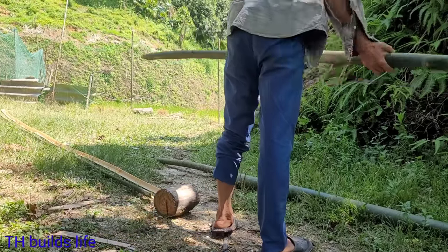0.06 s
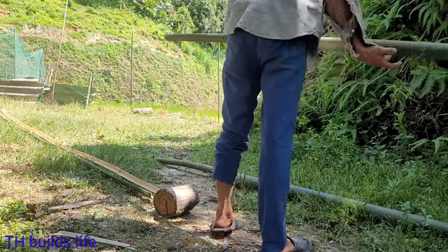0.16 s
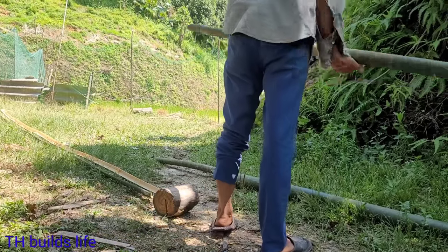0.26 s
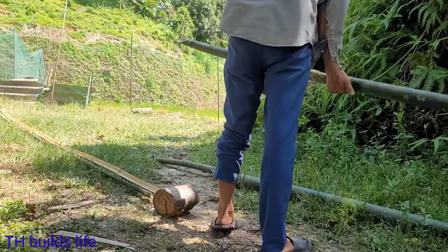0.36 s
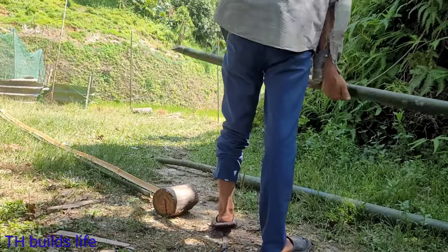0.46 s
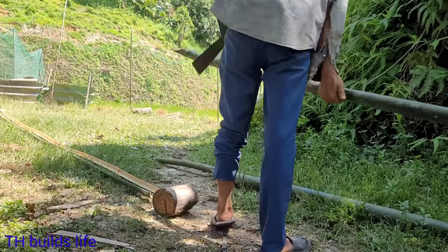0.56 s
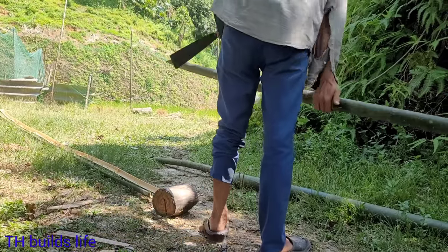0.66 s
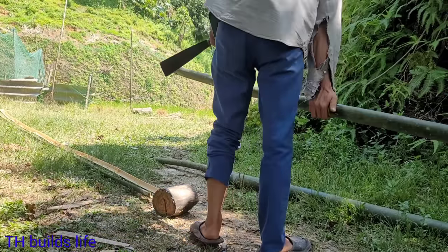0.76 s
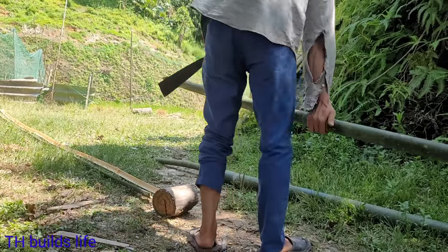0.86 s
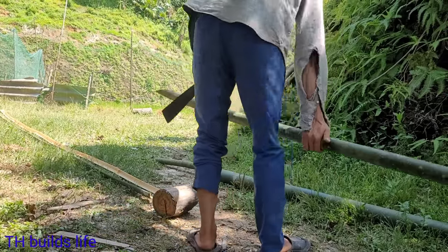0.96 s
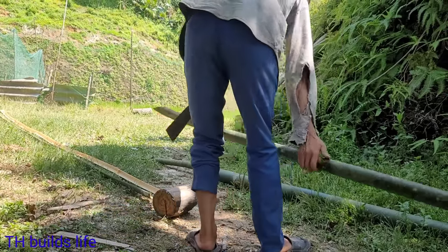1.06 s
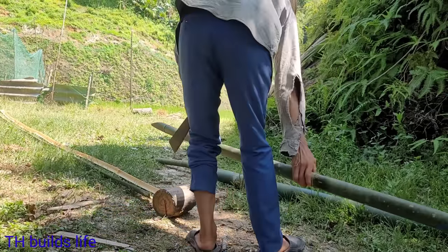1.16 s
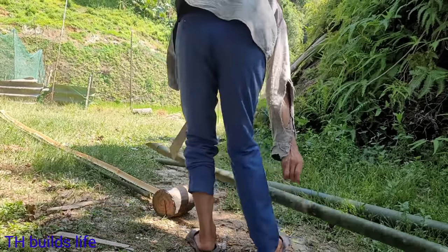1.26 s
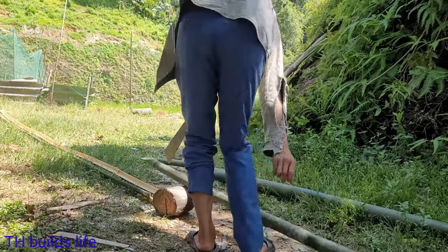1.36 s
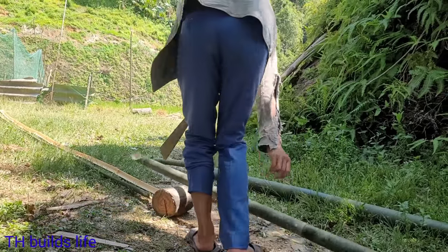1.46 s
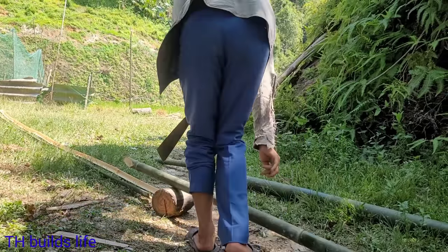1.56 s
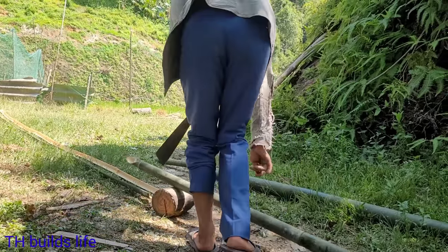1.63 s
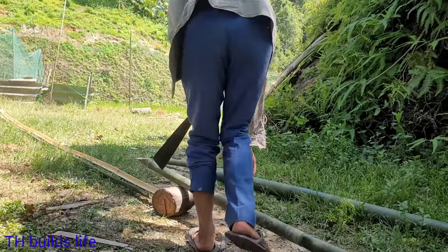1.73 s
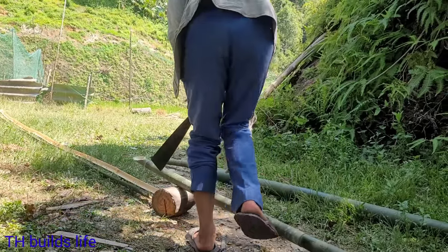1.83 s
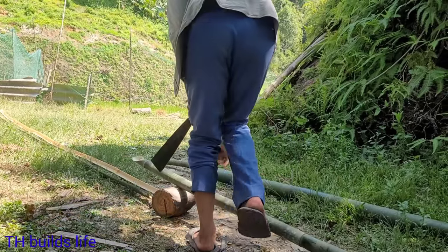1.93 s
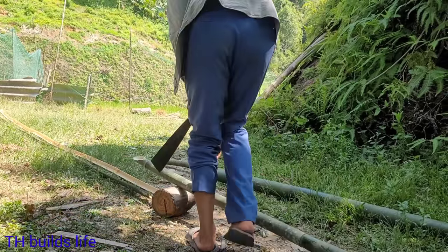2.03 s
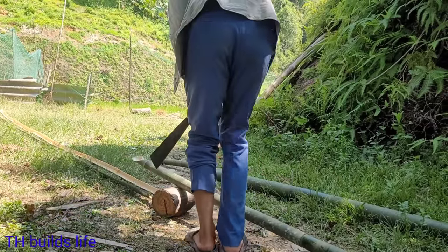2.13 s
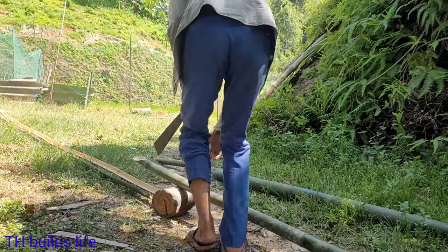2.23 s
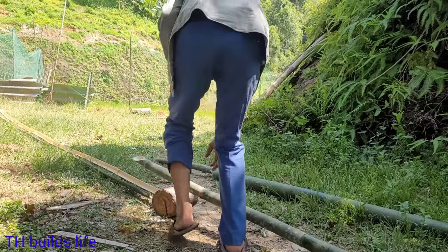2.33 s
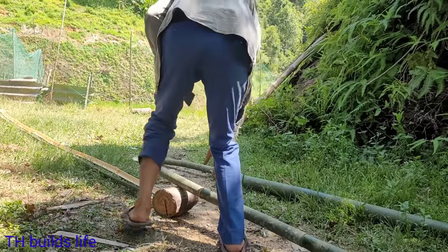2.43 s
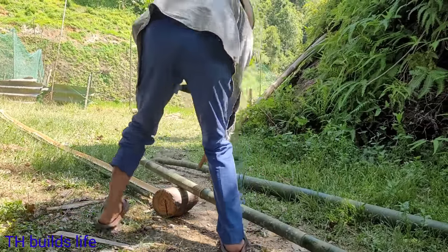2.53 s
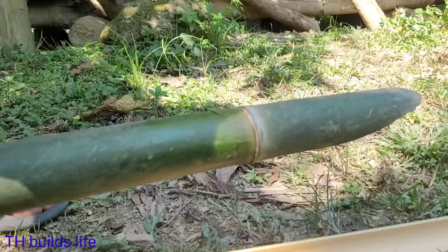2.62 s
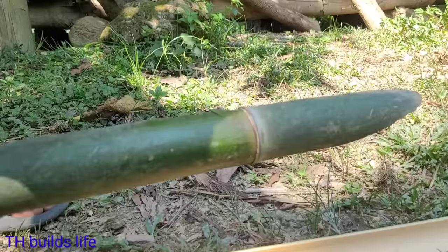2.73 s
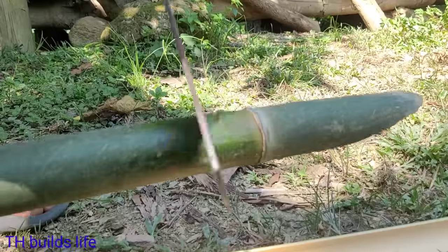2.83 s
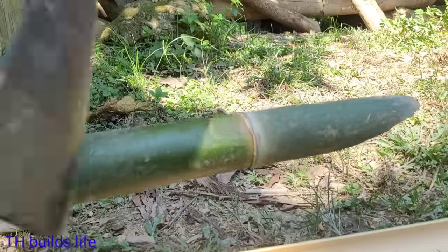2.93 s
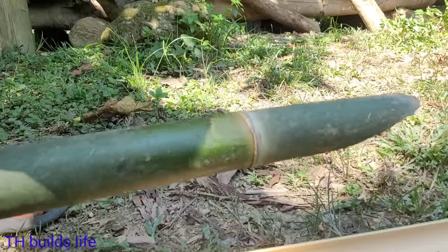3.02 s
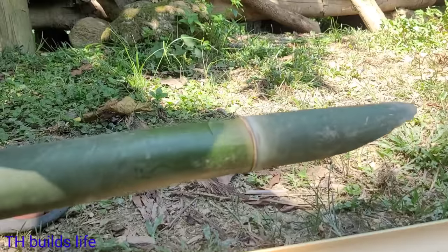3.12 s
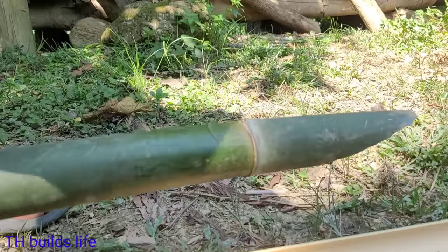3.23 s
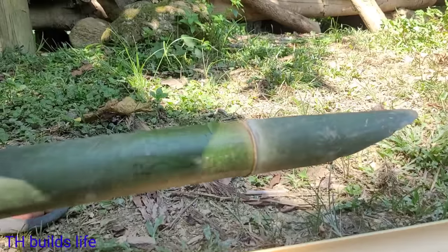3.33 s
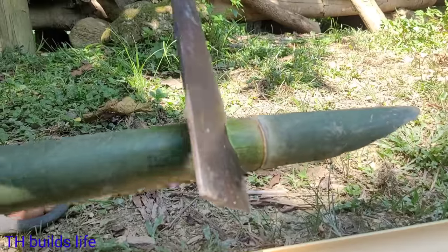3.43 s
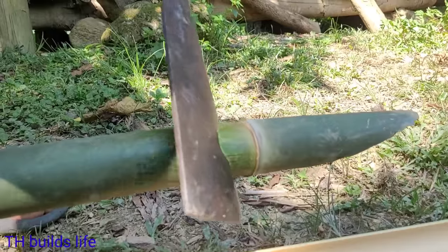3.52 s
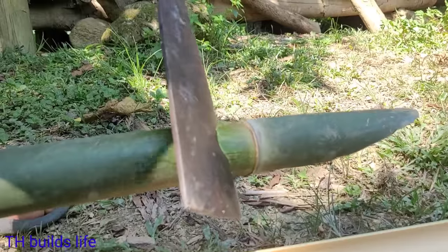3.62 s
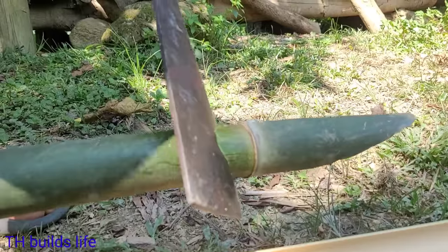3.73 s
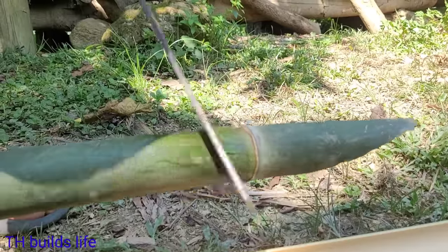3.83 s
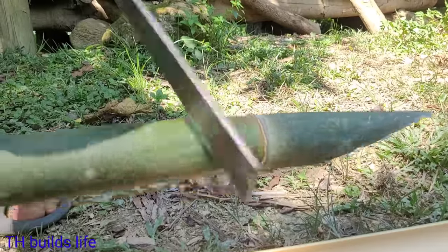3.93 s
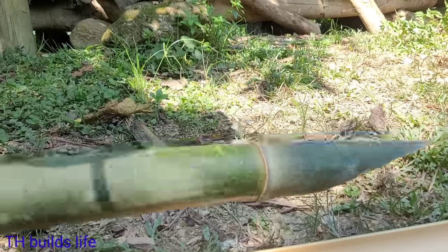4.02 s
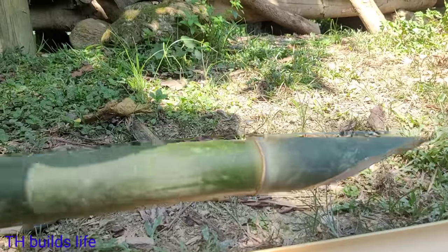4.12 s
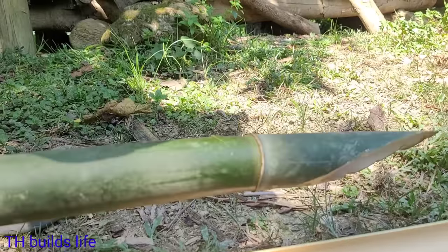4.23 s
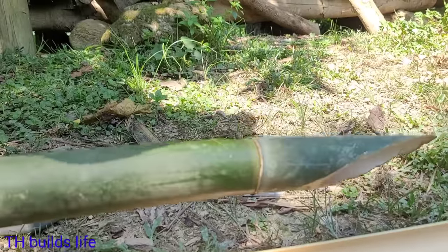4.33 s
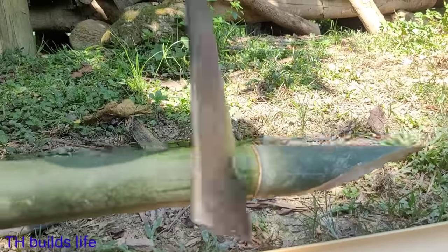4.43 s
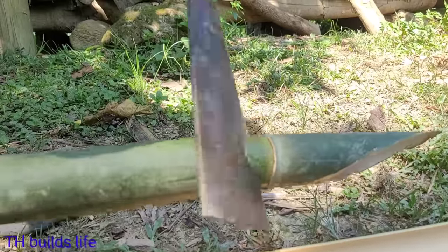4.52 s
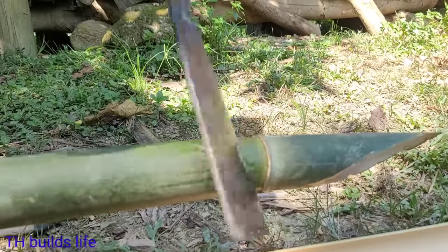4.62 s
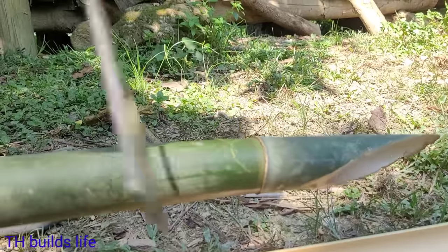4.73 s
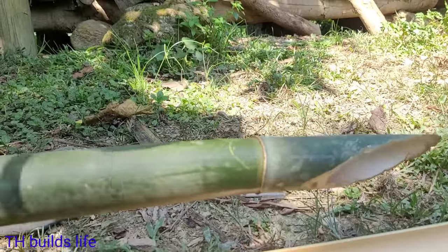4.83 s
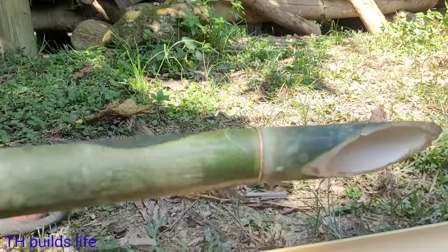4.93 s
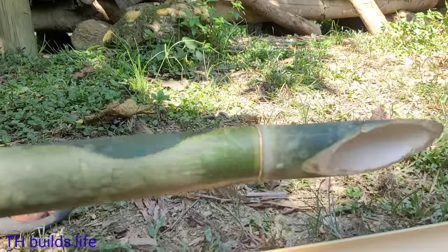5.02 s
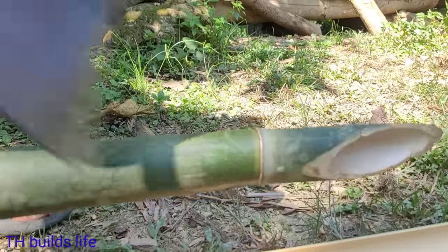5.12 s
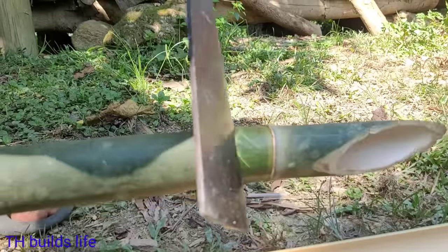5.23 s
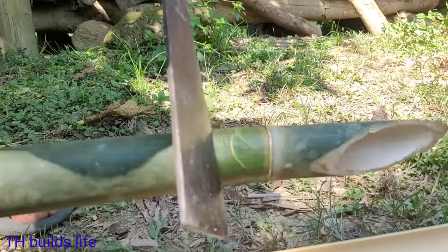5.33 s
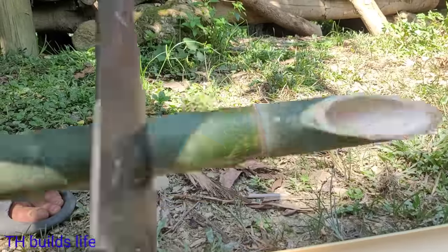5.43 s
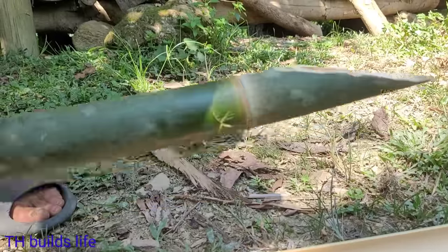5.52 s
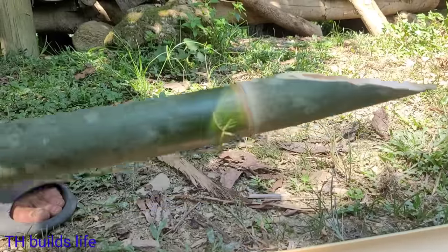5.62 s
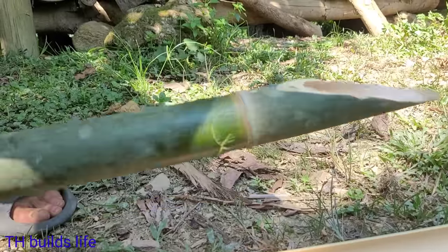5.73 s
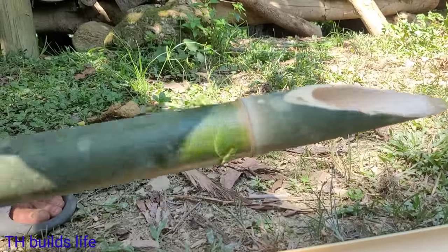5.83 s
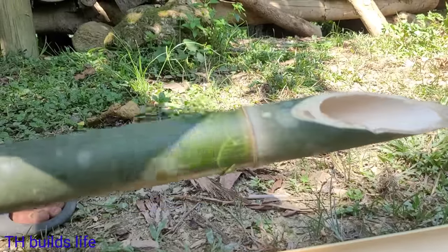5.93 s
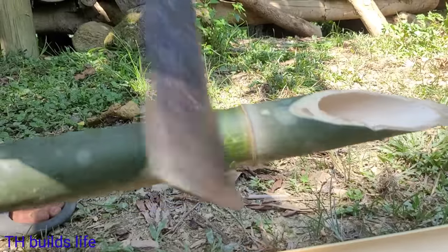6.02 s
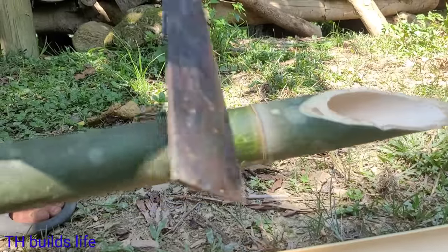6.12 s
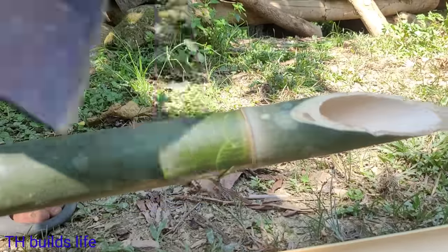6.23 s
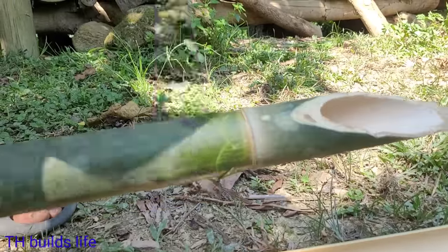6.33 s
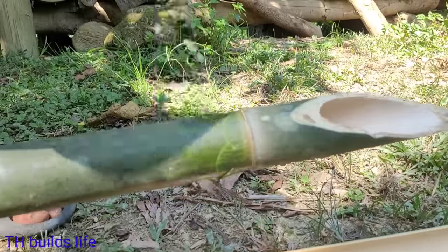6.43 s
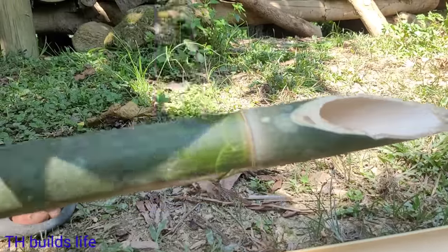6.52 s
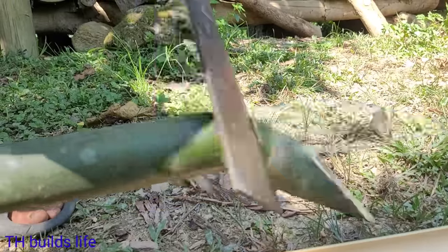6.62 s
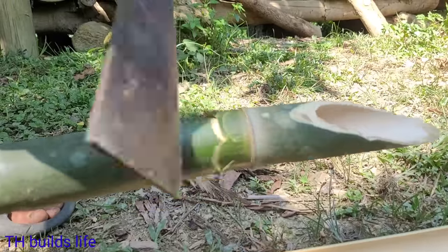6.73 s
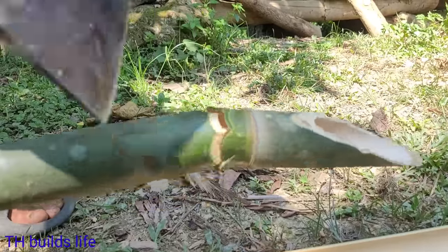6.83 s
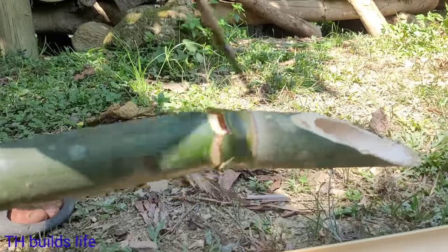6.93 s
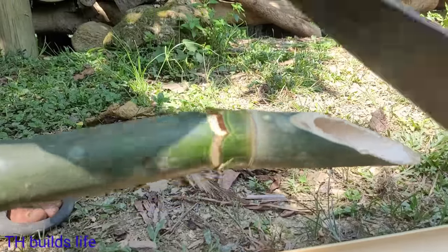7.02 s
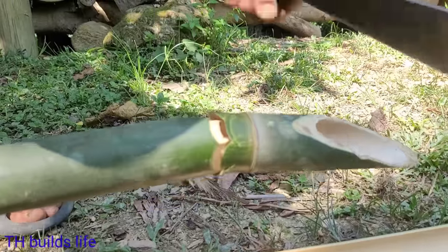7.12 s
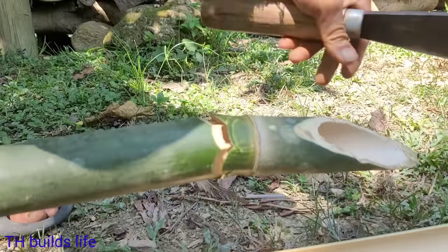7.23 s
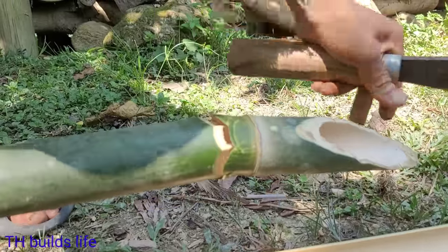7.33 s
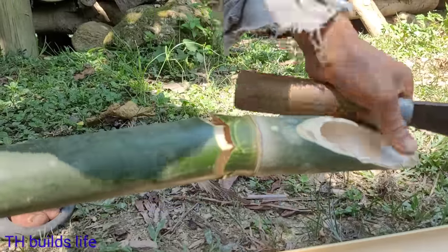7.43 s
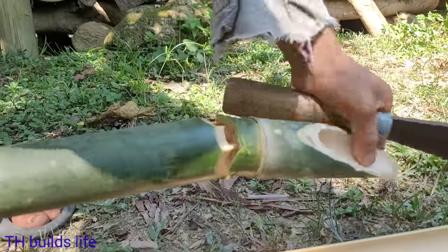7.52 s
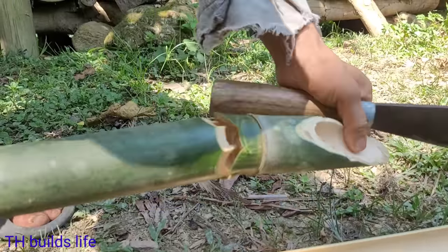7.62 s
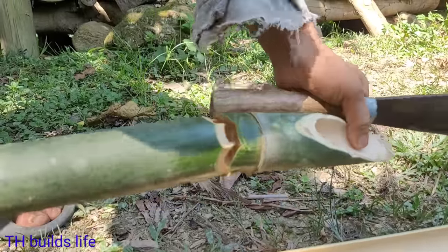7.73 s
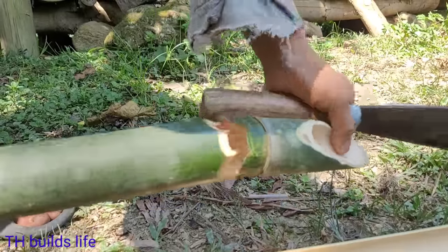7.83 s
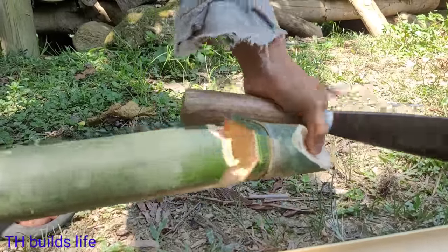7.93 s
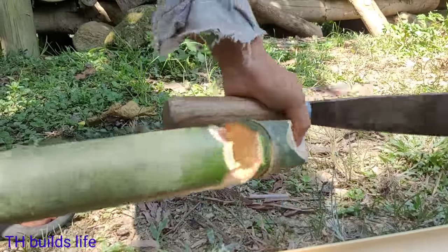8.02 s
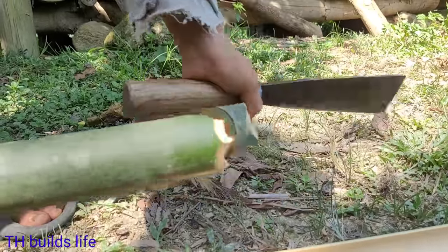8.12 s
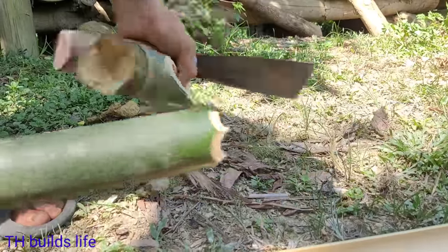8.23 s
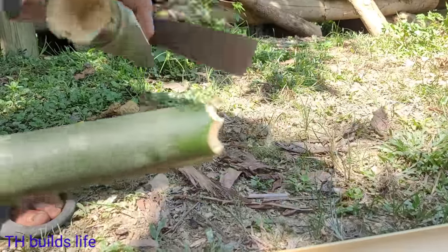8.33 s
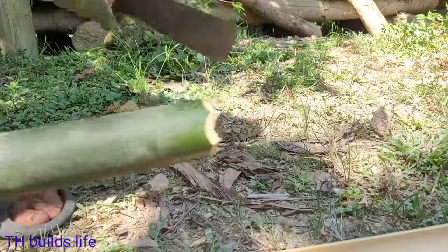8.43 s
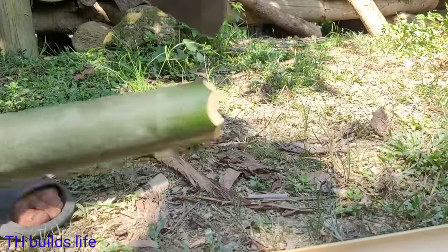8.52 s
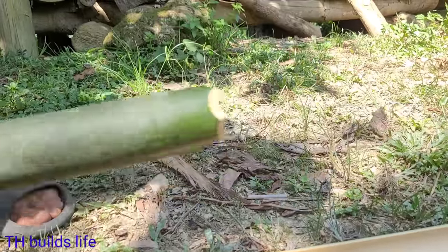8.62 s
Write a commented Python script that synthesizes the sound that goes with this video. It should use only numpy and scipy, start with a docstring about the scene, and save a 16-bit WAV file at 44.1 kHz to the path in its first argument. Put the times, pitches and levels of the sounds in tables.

```python
"""Outdoors, over throbbing insect bands and faint air, steps rustle in dry litter as a green bamboo pole is carried.
It drops across a log and bounces; then, closer, a blade chops a ring into it and it knocks as it is turned.
Last, the end is snapped and torn off by hand. Faint hums and far falling chirps come between.
Each blow is random contacts ringing tube, wall and sway modes, under filtered bursts of splintering fibres;
rustles are filtered clusters of grains."""
import sys
import numpy as np
from scipy import signal
from scipy.fft import rfft, irfft
from scipy.io import wavfile
from scipy.ndimage import uniform_filter1d

SR = 44100
rng = np.random.default_rng(int(sys.argv[2]) if len(sys.argv) > 2 else 0)


def waveform_to_disk(signal):
    """Save audio, clipped to [-1, 1], as 16-bit WAV at the path in sys.argv[1]."""
    frames = np.transpose(np.atleast_2d(signal))
    scaled = np.clip(frames, -1, 1) * 32767
    samples = np.round(scaled).astype(np.int16)
    wavfile.write(sys.argv[1], SR, samples)


N = 381906
FAR_LAG_SAMPLES, NEAR_LAG_SAMPLES = 22, -18  # delay of the left channel; negative delays the right


def undb(db):
    """Amplitude ratio of a level in dB."""
    return 10 ** (np.asarray(db) / 20)


def peak(x):
    """Scale so that the loudest 4 ms have rms 1."""
    power = uniform_filter1d(np.mean(x ** 2, axis=0), size=176)
    return x / np.sqrt(power.max())


def unit(x):
    """Scale to rms 1."""
    return x / np.sqrt(np.mean(x ** 2))


def fade(t, t60_s):
    """Exponential decay by 60 dB in t60_s, never shorter than 10 ms."""
    return np.exp(-np.log(1000) * t / max(t60_s, .01))


def pair(count, alike, scatter_db=0., density=0.85):
    """Two channels of partly shared random grains; sizes have a long tail, density is the share kept."""
    sizes = np.minimum(rng.exponential(size=(3, count)), 5)
    kept = rng.random((3, count)) < density
    grains = rng.standard_normal((3, count)) * undb(scatter_db * sizes) * kept
    return np.sqrt(alike) * grains[0] + np.sqrt(1 - alike) * grains[1:]


def bands(x, table):
    """Parallel resonances of alternating polarity."""
    out = 0
    for k, (hz, width_hz, db) in enumerate(table):
        b, a = signal.iirpeak(hz, hz / width_hz, fs=SR)
        out = out + (-1) ** k * undb(db) * signal.lfilter(b, a, x)
    return out


def ring(x, modes, t):
    """Decaying modes rung by x; every blow meets them a little differently."""
    chance = rng.standard_normal((len(modes), 2)) * [2, .015]  # dB, share of pitch
    u = t[:len(t) // 2]
    reply = 0
    for k, ((hz, db, t60_s), (extra_db, detune)) in enumerate(zip(modes, chance)):
        tone = np.sin(2 * np.pi * hz * (1 + detune) * u)
        reply = reply + (-1) ** k * undb(db + extra_db) * fade(u, t60_s) * tone
    return signal.fftconvolve(x, reply[None])[:, :len(t)]


def place(x, pan_db, lag_samples):
    """Left-over-right level in dB, and time difference."""
    left, right = np.roll(x[0], max(lag_samples, 0)), np.roll(x[1], max(-lag_samples, 0))
    return np.array([left * undb(pan_db / 2), right * undb(-pan_db / 2)])


# Air spectrum. Each row: frequency in Hz, relative density in dB.
AIR_SPECTRUM = [(18, -32.5), (46, -4), (266, -10), (2010, -23), (3400, -20), (4420, -19.5), (5450, -16),
                (6550, -24), (7670, -15), (11400, -5), (12600, -10), (13700, -26), (16000, -17.5)]
# Air level. Each row: time in seconds, level in dB.
AIR_LEVEL = [(0, -57), (2.7, -67), (2.85, -64), (8.66, -61)]
# Insect bands. Each row: centre in Hz, width of the first filter in Hz, mean throbs per second,
# level in dB up to 2.7 s, level in dB from 2.8 s.
INSECT_BANDS = [(7800, 120, 15, -73.5, -83), (10500, 3900, 24, -64.5, -80.5), (11900, 900, 17, -62, -79)]


def bushes():
    """Shaped noise for air; band noise with a drifting amplitude throb for insects."""
    t = np.arange(N) / SR
    hz, db = np.transpose(AIR_SPECTRUM)
    f = np.fft.rfftfreq(N, 1 / SR) + 1
    air = irfft(rfft(pair(N, 0.11)) * undb(np.interp(np.log(f), np.log(hz), db)), N)
    out = unit(air) * undb(np.interp(t, *np.transpose(AIR_LEVEL)))
    near = np.clip((t - 2.7) / .1, 0, 1)
    for hz, width_hz, rate_hz, first_db, later_db in INSECT_BANDS:
        drift = unit(uniform_filter1d(rng.standard_normal(N), size=4000))
        throb = 1 + 0.24 * np.sin(2 * np.pi * np.cumsum(rate_hz * (1 + .03 * drift)) / SR)
        narrow = bands(pair(N, 0.16), [(hz, width_hz, 0)])
        band = unit(bands(narrow, [(hz, 2 * width_hz, 0)]))
        out += undb(first_db + (later_db - first_db) * near) * throb * band
    return out


# Faint chirps far off. Each row: start in seconds, length in seconds, start in Hz, end in Hz, level in dB.
FALLING_CHIRPS = [(3.62, 0.18, 5070, 4080, -58.5), (4.214, 0.18, 5350, 4240, -62),
                  (4.913, 0.16, 5300, 4170, -67), (6.33, 0.21, 5340, 3900, -72)]


def chirps():
    """Smoothed noise times a downward sine sweep makes a husky falling whistle."""
    t, out = np.arange(N) / SR, 0
    husk = unit(uniform_filter1d(pair(N, 0.33), size=60))
    for s, length_s, start_hz, end_hz, db in FALLING_CHIRPS:
        u = np.clip((t - s) / length_s, 0, 1)
        phase = 2 * np.pi * np.cumsum(start_hz + (end_hz - start_hz) * u) / SR
        out = out + undb(db) * np.sin(np.pi * u) * np.sin(phase) * husk
    return out


# Faint low notes, perhaps the hollow pole shifting in the hand.
# Each row: start in seconds, length in seconds, pitch in Hz, level in dB before the swell.
HUM_NOTES = [(3.277, 0.077, 504, -69.5), (3.305, .04, 1280, -73), (5.082, 0.092, 494, -63),
             (5.12, 0.089, 735, -68.5), (6.872, 0.065, 735, -64.5), (6.87, 0.066, 513, -72.5),
             (7.05, 0.44, 524, -74), (7.098, 0.1, 1280, -77.5), (7.27, 0.11, 734, -64.5),
             (7.757, 0.15, 520, -71), (7.79, 0.083, 735, -66)]


def hum():
    """Noise through two narrow resonances, swelling and fading as a half sine."""
    out, count = np.zeros((2, N + SR)), SR // 2
    t = np.arange(count) / SR
    for s, length_s, hz, db in HUM_NOTES:
        width_hz = .13 * hz
        narrow = bands(pair(count, 0.26), [(hz, width_hz, 0)])
        note = unit(bands(narrow, [(hz, 2 * width_hz, 0)]))
        i = int(s * SR)
        out[:, i:i + count] += undb(db) * note * np.sin(np.pi * np.clip(t / length_s, 0, 1))
    return out[:, :N]


RISE_DB = 32  # a rustle climbs this far during its rise
# Treble resonances of rustles and fibres. Each row: centre in Hz, width in Hz, gain in dB.
FIZZ_BANDS = [(4760, 1200, 1.5), (6330, 2800, -0.5), (8030, 1100, 3.5), (10900, 2000, 1),
              (15200, 2400, -3.5), (6380, 70, -3), (7590, 28, 4.5), (10150, 74, -3.5)]


def rustle(table, body, lag_samples, scatter_db, density, fall_t60_s, pan_db):
    """Dense grains in the body and in the treble; each gesture rises, holds and dies away."""
    t = np.arange(N) / SR
    # grains cluster over a few milliseconds
    clusters = undb(3 * unit(uniform_filter1d(rng.standard_normal(N), size=300)))
    low = unit(bands(clusters * pair(N, 0.17, scatter_db, density), body))
    high = unit(bands(clusters * pair(N, 0.13, scatter_db, 3 * density), FIZZ_BANDS))
    body_power, treble_power = np.zeros(N), np.zeros(N)
    for s, rise_s, hold_s, db, treble_db in table:
        rise = undb(db - RISE_DB * np.clip(1 - (t - s) / rise_s, 0, 1)) * (t > s)
        shape = rise * fade(np.maximum(t - s - rise_s - hold_s, 0), fall_t60_s)
        body_power += shape ** 2
        treble_power += (shape * undb(treble_db)) ** 2
    return place(low * np.sqrt(body_power) + high * np.sqrt(treble_power), pan_db, lag_samples)


# Litter underfoot. Each row: start in seconds, rise in seconds, hold in seconds, body level in dB,
# treble in dB above the body.
LITTER_STEPS = [(0.01, 0.053, 0.079, -65, 1), (.11, 0.067, 0.04, -64, 19.5), (.29, 0.012, .14, -33.5, -5),
                (.46, 0.05, 0.013, -44, -28), (.58, 0.026, 0.092, -49.5, -8),
                (.85, 0.032, 0.023, -45, -3.5), (1.18, 0.068, 0.031, -36, -7),
                (1.3, 0.017, 0.073, -45.5, -1), (2.14, 0.055, 0.008, -36.5, -2),
                (2.35, 0.026, .015, -48, -4.5), (2.64, 0.041, 0.0069, -40, -8.5),
                (2.76, 0.023, 0.014, -49, -3.5)]
# Litter body. Each row: centre in Hz, width in Hz, gain in dB.
LITTER_BANDS = [(420, 270, -2.5), (856, 700, 4), (1720, 1300, 4.5)]


def steps():
    """Dry litter crushed underfoot: scattered grains in broad low resonances."""
    return rustle(LITTER_STEPS, LITTER_BANDS, FAR_LAG_SAMPLES, scatter_db=2.5, density=0.09,
                  fall_t60_s=0.13, pan_db=-4)


# Hands on the pole. Each row: start in seconds, rise in seconds, hold in seconds, body level in dB,
# treble in dB above the body.
HAND_RUBS = [(3.63, 0.044, 0.031, -57.5, 1.5), (3.83, 0.022, .04, -60.5, 9.5), (5.34, 0.04, 0.061, -62, 12),
             (5.4, 0.057, 0.036, -45.5, 2.5), (8.15, 0.0072, .01, -31.5, -2.5),
             (8.2, 0.0046, 0.0055, -50, -2), (8.24, 0.011, 0.031, -44.5, -25),
             (8.31, 0.027, 0.061, -54.5, -14), (8.38, 0.017, 0.014, -46, -19),
             (8.5, 0.065, 0.086, -63.5, -3)]
# Torn-fibre body. Each row: centre in Hz, width in Hz, gain in dB.
TORN_BANDS = [(1194, 1620, -15.5), (1594, 210, -1.5), (1930, 170, -10), (2440, 122, 5), (2477, 170, 2),
              (3350, 640, -8.5)]


def hands():
    """Hands rubbing the pole: even grains in the fibre and litter resonances."""
    return rustle(HAND_RUBS, TORN_BANDS + LITTER_BANDS, NEAR_LAG_SAMPLES, scatter_db=0.3, density=.04,
                  fall_t60_s=.25, pan_db=2.2)


# Fibres tearing. Each row: start in seconds, rise in seconds, hold in seconds, body level in dB,
# treble in dB above the body.
FIBRE_TEARS = [(8.096, 0.016, 0.032, -14.5, 4.5), (8.15, 0.0046, .02, -38, 5.5)]


def tear():
    """Fibres parting: a quickly dying burst of grains in the fibre resonances."""
    return rustle(FIBRE_TEARS, TORN_BANDS, NEAR_LAG_SAMPLES, scatter_db=1.0, density=0.05,
                  fall_t60_s=0.061, pan_db=2.5)


TOUCH_S = .0008  # build-up of the contact
# Sway of the whole pole. Each row: frequency in Hz, gain in dB, t60 in seconds.
SWAY_MODES = [(38.3, -4, 0.036), (54, 0.5, 0.15), (71.4, -4.5, 0.16), (81, -9, 0.33), (99, -2, 0.04)]


def sway(contacts, t, rattle_s):
    """A half-sine thump and the contacts set the pole swaying unevenly until the hand stills it."""
    thump = np.sin(np.pi * np.clip(t / 0.0019, 0, 1))
    push = thump + 0.37 * contacts * fade(t, 8.6 * rattle_s)
    return peak(ring(push, SWAY_MODES, t)) * np.clip((.38 - t) / 0.13, 0, 1)


# Resonances of the fibres and the blade. Each row: centre in Hz, width in Hz, gain in dB.
SPLINTER_BANDS = [(1530, 250, 1.5), (2106, 270, -0.5), (2317, 270, -0.5), (2940, 900, -3),
                  (3910, 1700, -5.5)]


def fibres(t, crack_s, splinter_t60_s, splinter_tail_db, fizz_tail_db):
    """A short crack and a longer tail of breaking grains: sparse in the splinter, dense in the fizz."""
    touch = np.minimum(t / TOUCH_S, 1)
    crack = np.exp(-t / crack_s) * touch ** 2
    tail = fade(t, splinter_t60_s) * touch
    splinter = (crack + undb(splinter_tail_db) * tail) * pair(len(t), 0.49, scatter_db=3.5, density=.05)
    fizz = (crack + undb(fizz_tail_db) * tail) * pair(len(t), 0.14, scatter_db=2.5, density=0.41)
    splinter = bands(bands(splinter, SPLINTER_BANDS), [(2303, 3000, 0)])
    return peak(splinter), peak(bands(fizz, FIZZ_BANDS))


WALL_HZ = 780  # modes from here up flex the wall of the tube
WALL_DB_PER_SPLINTER_DB = 0.33
CUT_S, LOOSE_DB = 6.6, -3.5  # from CUT_S the ring is cut through and the end hangs loose; dB above the sway
# Bending of the pole. Each row: frequency in Hz, gain in dB, t60 in seconds.
BEND_MODES = [(131, -5, 0.092), (171, -2, 0.099), (215, 2, 0.0092)]
# Hanging cut end. Each row: frequency in Hz, gain in dB, t60 in seconds.
LOOSE_END_MODES = [(170.7, -3, .22), (192.5, -10, 0.19)]


def blows(table, modes, lag_samples, click, swell, hold_s, crack_s, splinter_t60_s, splinter_tail_db,
          fizz_tail_db, wall_db, wall_loss_per_fizz_db, rattle_tail_db, bend_db, pan_db, bass_left_db):
    """A click and a rattle of small contacts ring the pole; a crack with a splintering tail lies on top."""
    out, count = np.zeros((2, N + SR)), SR // 2
    t = np.arange(count) / SR
    tube = [m for m in modes if m[0] < WALL_HZ]
    wall = [m for m in modes if m[0] >= WALL_HZ]
    touch = int(TOUCH_S * SR)
    sway_pan_db = np.array([[.5], [-.5]]) * bass_left_db
    for s, db, sway_db, splinter_db, fizz_db, rattle_s in table:
        contacts = pair(count, 0.83, scatter_db=2.6, density=.035)
        contacts[:, :touch] = 0
        contacts[:, touch] += click
        # low bending waves travel slowly and swell over the hold
        late = np.maximum(t - hold_s, 0)
        dying = fade(late, .5 * rattle_s) + undb(rattle_tail_db) * fade(late, 1.42 * rattle_s)
        slow = contacts * dying * (1 - swell * np.maximum(1 - t / hold_s, 0))
        # the wall answers at once and dies sooner
        early = np.maximum(t - 0.52 * hold_s, 0)
        quick = contacts * (fade(early, 0.4 * rattle_s) + undb(rattle_tail_db) * fade(early, 1.4 * rattle_s))

        hit = peak(ring(slow, tube, t))
        hit += undb(sway_db + bend_db) * peak(ring(slow, BEND_MODES, t))
        hit += undb(sway_db + sway_pan_db) * sway(contacts, t, rattle_s)
        if s > CUT_S:
            hit += undb(sway_db + LOOSE_DB) * peak(ring(slow, LOOSE_END_MODES, t))
        splinter, fizz = fibres(t, crack_s, splinter_t60_s, splinter_tail_db, fizz_tail_db)
        hit += undb(splinter_db) * splinter + undb(fizz_db) * fizz

        wall_gain_db = wall_db + WALL_DB_PER_SPLINTER_DB * splinter_db - wall_loss_per_fizz_db * fizz_db
        wall_ring = undb(wall_gain_db) * peak(ring(quick, wall, t))
        # the wall sounds from a long stretch of the pole, so its channels lag less
        both = place(hit, pan_db, lag_samples) + place(wall_ring, pan_db, lag_samples // 2)
        i = int(s * SR)
        out[:, i:i + count] += undb(db) * both * np.clip((.48 - t) / 0.097, 0, 1)
    return out[:, :N]


# Turning knocks. Each row: start in seconds, tube peak in dB, then sway, splinter and fizz in dB above
# the tube, rattle time in seconds (scaled per layer).
TURNING_KNOCKS = [(3.599, -52.5, -12.5, -8, -7, 0.2), (3.864, -50.5, -8.5, 4, 11.5, 0.37),
                  (3.95, -44.5, -37, -0.5, 5.5, 0.22), (4.019, -48.5, -32, 1.5, -19.5, 0.18),
                  (4.063, -41.5, -27, 0.5, -35, 0.14), (4.095, -26, -9, -15.5, -25.5, 0.18),
                  (4.236, -45.5, -17, -1.5, -20.5, 0.22), (4.728, -37.5, -31.5, -5.5, 2, 0.16),
                  (4.901, -46.5, -23, -0.5, -26, 0.3), (4.943, -61, -3.5, 8.5, -10, 0.16),
                  (4.988, -56.5, -22, -11, -10, 0.17), (5.262, -23.5, -13, -12, -12, 0.16),
                  (5.301, -30, -24, -0.5, -6.5, 0.19), (5.351, -29.5, -27, -3, -8, 0.059),
                  (5.411, -34.5, -21, -5, 5, 0.16), (5.572, -42.5, -17, -9, -38, 0.057),
                  (5.6, -24, -20, -11, -40, 0.41), (5.764, -45.5, -2, -12, -10.5, 0.45),
                  (5.81, -31, -7, -12, -21, 0.26), (6.849, -48, -1, -17, -10, 0.23),
                  (7.506, -44, -18, -9, -17, 0.23), (7.605, -61, -11.5, -3, 2.5, 0.19),
                  (8.249, -32.5, -4, -42, -21, 0.3), (8.54, -58, -10, -8, -13, 0.55)]
# Near end of the pole. Each row: frequency in Hz, gain in dB, t60 in seconds.
NEAR_END_MODES = [(246.9, -7, 0.056), (287.5, -0.5, 0.027), (327, -6, .045), (403.5, -7.5, 0.057),
                  (480, -2.5, 0.034), (555, -10, 0.044), (612.2, -4.5, 0.036), (731.7, -1, 0.017),
                  (780.6, -7, 0.064), (835, -4.5, 0.041), (942, -4.5, 0.041), (1037.6, 1, 0.057),
                  (1179, -3.5, .03), (1344, -5.5, 0.036), (1601, -7.5, .035), (1772, -6, 0.032),
                  (1960, -4, 0.024)]


def knocks():
    """The pole knocks as it is turned: soft clicks ring the near end."""
    return blows(TURNING_KNOCKS, NEAR_END_MODES, NEAR_LAG_SAMPLES, click=5.6, swell=0.11, hold_s=0.0099,
                 crack_s=0.0093, splinter_t60_s=0.28, splinter_tail_db=-9, fizz_tail_db=-21.5,
                 wall_db=-2, wall_loss_per_fizz_db=0.25, rattle_tail_db=-13, bend_db=3.5,
                 pan_db=2.5, bass_left_db=-4.0)


# Snapping fibres. Each row: start in seconds, tube peak in dB, then sway, splinter and fizz in dB above
# the tube, rattle time in seconds (scaled per layer).
FIBRE_SNAPS = [(2.863, -15.5, -14.5, -20.5, -6.5, 0.063), (2.903, -27.5, -11.5, -7.5, 6, 0.082),
               (2.919, -32, -2.5, -21.5, 10, 0.13), (5.366, -42, -13, -28, 3, 0.051),
               (5.38, -49, -13, -13, 11, 0.08), (5.436, -71.5, -17, 8, 44, 0.22),
               (7.865, -32.5, -19.5, 14, 19, 0.24), (7.952, -49, -33, 21.5, 28.5, 0.045),
               (7.955, -51.5, -32, 17, 31.5, 0.27), (8.013, -55, -27, 20, 32.5, 0.38),
               (8.06, -51, -4, 19, 28.5, 0.49), (8.1, -30, -13, 10, 14, 0.1),
               (8.208, -42, -3.5, 13, 9.5, 0.062), (8.295, -62, -9, 7, -1, 0.19),
               (8.312, -50.5, 2, 12, 13, 0.031), (8.406, -48.5, -3, 12, -1, 0.15),
               (8.442, -59, 6, -1, 4, 0.14)]
# Cut end of the pole. Each row: frequency in Hz, gain in dB, t60 in seconds.
CUT_END_MODES = [(367, -6.5, 0.013), (585, -3, 0.01), (950, 0.5, 0.036), (1200, -3.5, 0.05),
                 (1660, -2, 0.016)]


def snaps():
    """Fibres snap: weak clicks ring the short cut end under strong splintering."""
    return blows(FIBRE_SNAPS, CUT_END_MODES, NEAR_LAG_SAMPLES, click=2.2, swell=.1, hold_s=.0022,
                 crack_s=.0025, splinter_t60_s=0.13, splinter_tail_db=-2.5, fizz_tail_db=-14,
                 wall_db=-1.5, wall_loss_per_fizz_db=.02, rattle_tail_db=-13.5, bend_db=-0.5,
                 pan_db=2.5, bass_left_db=1.5)


# Faint snaps while the pole is carried, then its drop and bounces. Each row: start in seconds, tube peak in dB,
# then sway, splinter and fizz in dB above # the tube, rattle time in seconds (scaled per layer).
POLE_DROPS = [(0.025, -57, -25, -5, -21, 0.31), (0.302, -39, -25, -4, -9, 0.9),
              (0.471, -32.5, -47, 6.5, -3, 0.25), (0.605, -68, -22, 22, 18, 0.14),
              (0.653, -76, -30, 16, -7, 0.43), (0.699, -71, -25, 6, -8, 0.11),
              (0.733, -71.5, -22, 18.5, -7, 0.32), (0.877, -54.5, -14, 14.5, 10, 0.089),
              (0.919, -46.5, -36, 4, 0, 0.037), (1.272, -60, -45, 27, 32, 0.18),
              (1.294, -60, -18, 24.5, 17, 0.13), (1.327, -50.5, -25, 6, -10, 0.48),
              (1.409, -10, -23.5, 5, -17, 0.61), (1.431, -7.5, -42, 1, -11.5, 0.25),
              (1.446, -9, -30, -11, -24, 0.22), (1.586, -15, -25, -2.5, -17.5, 0.74),
              (1.663, -17.5, -22.5, -3.5, -17.5, 0.41), (1.777, -26, -22, -11.5, -24, 0.23),
              (1.814, -34.5, -19, 15.5, -1.5, 0.39), (1.841, -29, -30, -10, -22, 0.11),
              (1.964, -22.5, -29.5, -14, -24, 0.3), (2.075, -34, -23.5, -29, -29, 0.38),
              (2.197, -34, -22, 5, -10, 0.22), (2.37, -53.5, -21, 5, 0, 0.085),
              (2.395, -51.5, -45.5, 3.5, -3.5, 0.042), (2.678, -49, -10.5, 6.5, -12, 0.078),
              (2.779, -62.5, -10.5, 16.5, -19, 0.097)]
# Whole pole. Each row: frequency in Hz, gain in dB, t60 in seconds.
LONG_POLE_MODES = [(295.3, -10.5, 0.058), (378.8, -8, 0.096), (471, -1.5, 0.042), (600, -1.5, 0.059),
                   (610.4, -0.5, 0.039), (696, 3.5, 0.016), (830, -5, .04), (944, -8, 0.068),
                   (1110, 0, 0.011), (1260, -4.5, 0.031), (1355.7, -9.5, 0.092), (1595, -7, 0.036),
                   (1740, -7, 0.013), (1950, -3.5, 0.051)]


def drops():
    """Faint snaps and knocks come as the pole is carried; then it falls across a log and bounces: hard clicks
    ring its full length."""
    return blows(POLE_DROPS, LONG_POLE_MODES, FAR_LAG_SAMPLES, click=9.8, swell=0.77, hold_s=.006,
                 crack_s=0.0023, splinter_t60_s=0.32, splinter_tail_db=-20.5, fizz_tail_db=-7.0,
                 wall_db=4, wall_loss_per_fizz_db=0.033, rattle_tail_db=-13.5, bend_db=3.5,
                 pan_db=-3, bass_left_db=1.5)


# Blade chops. Each row: start in seconds, tube peak in dB, then sway, splinter and fizz in dB above
# the tube, rattle time in seconds (scaled per layer).
BLADE_CHOPS = [(2.827, -8, -7, -5, -1, 0.18), (2.877, -15.5, -20.5, -3.5, -2.5, 0.23),
               (3.427, -4.5, -15, -8.5, -1.5, 0.17), (4.49, -7, -12.5, -3.5, 0, 0.17),
               (5.21, -9, -11.5, -3.5, 2, 0.33), (6.096, -5, -14, -5.5, -4.5, 0.2),
               (6.641, -10, -7.5, -1.5, 5.5, 0.19)]


def chops():
    """The blade chops a ring into the pole: firm clicks ring the near end, with a strong splinter tail."""
    return blows(BLADE_CHOPS, NEAR_END_MODES, NEAR_LAG_SAMPLES, click=7.2, swell=0.65, hold_s=0.025,
                 crack_s=0.0026, splinter_t60_s=0.22, splinter_tail_db=-5.5, fizz_tail_db=-19.0,
                 wall_db=1.0, wall_loss_per_fizz_db=-0.18, rattle_tail_db=-7, bend_db=-2,
                 pan_db=1.04, bass_left_db=7)


def scene():
    """Sum of all layers, background first."""
    background = bushes() + chirps() + hum()
    rustles = steps() + hands() + tear()
    return background + rustles + knocks() + snaps() + drops() + chops()


def record(dry):
    """Soft limiting rounds the loudest peaks; an elliptic low-pass cuts the top above 15.7 kHz."""
    limited = 1.002 * np.tanh(dry / 1.09)
    return signal.sosfilt(signal.ellip(8, .2, 60, 15700, fs=SR, output="sos"), limited)


dry = scene()
out = record(dry)
waveform_to_disk(out)
```